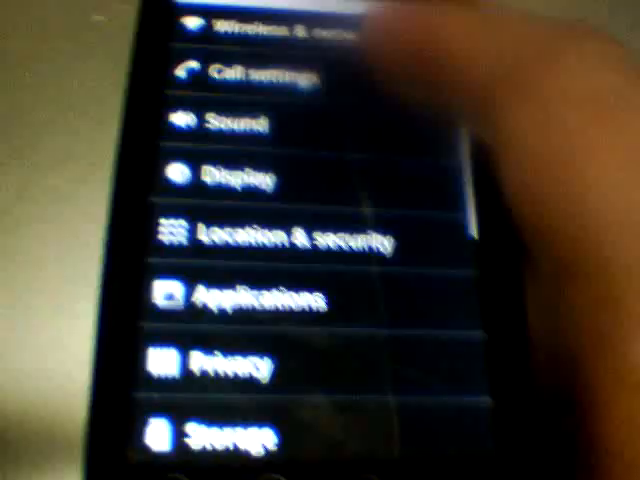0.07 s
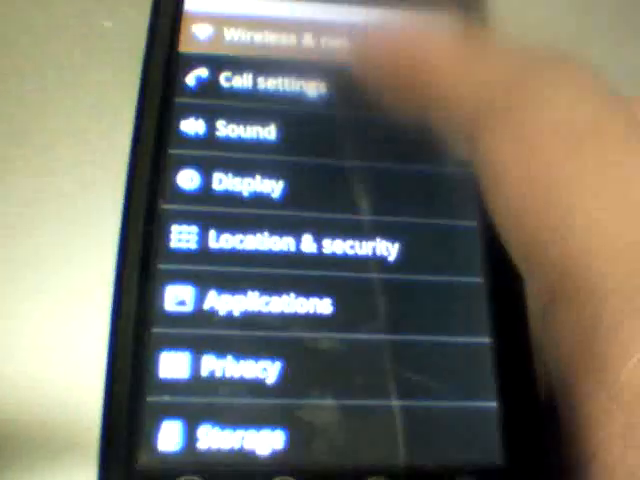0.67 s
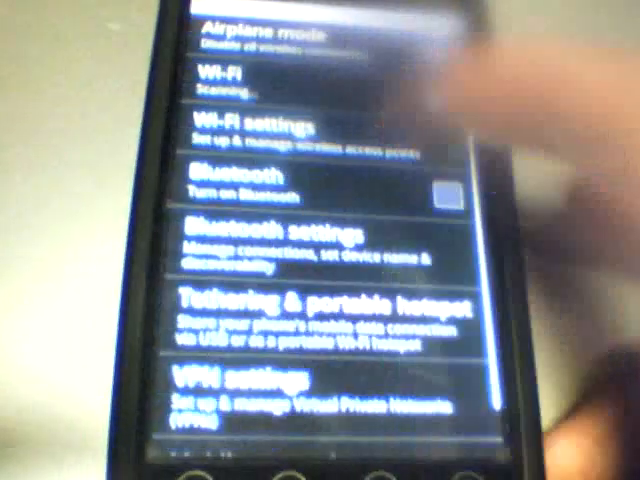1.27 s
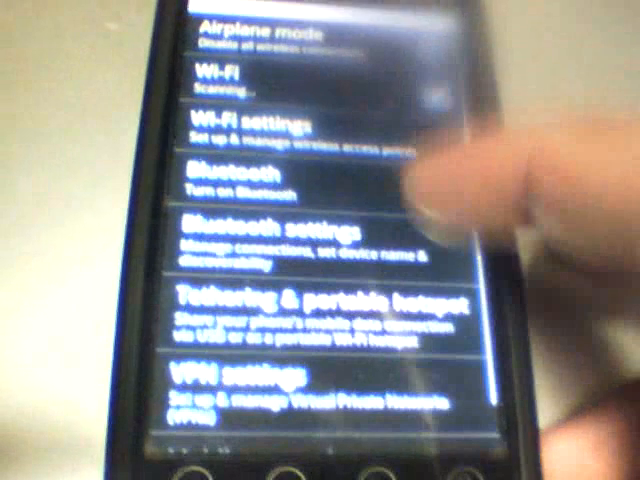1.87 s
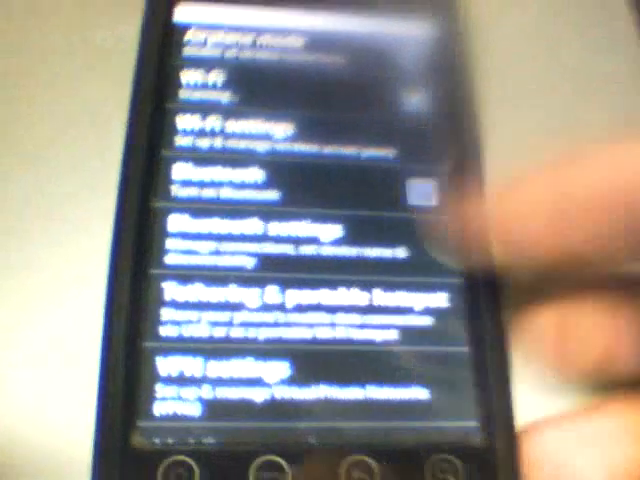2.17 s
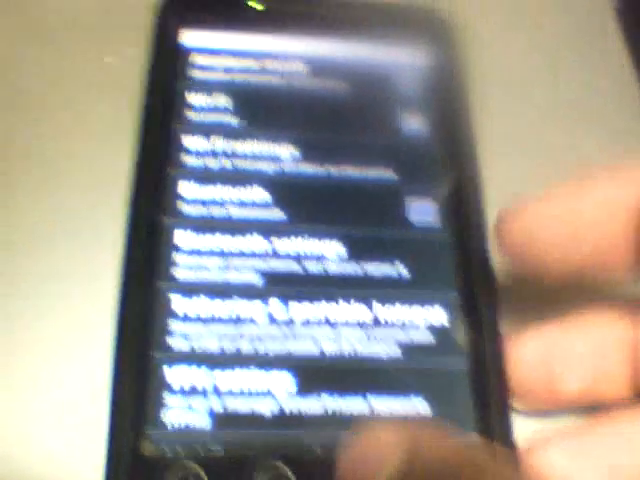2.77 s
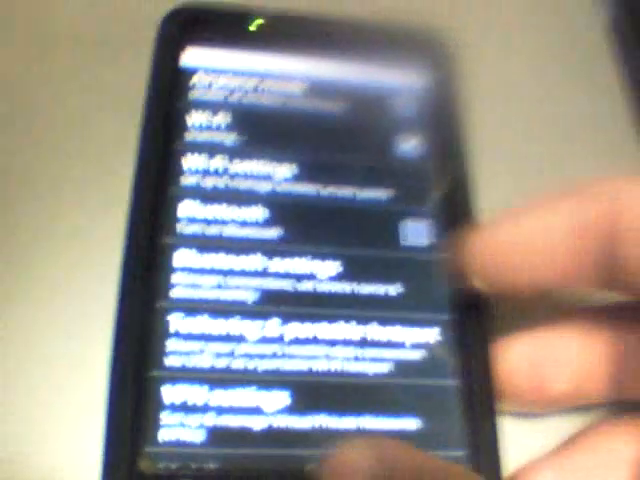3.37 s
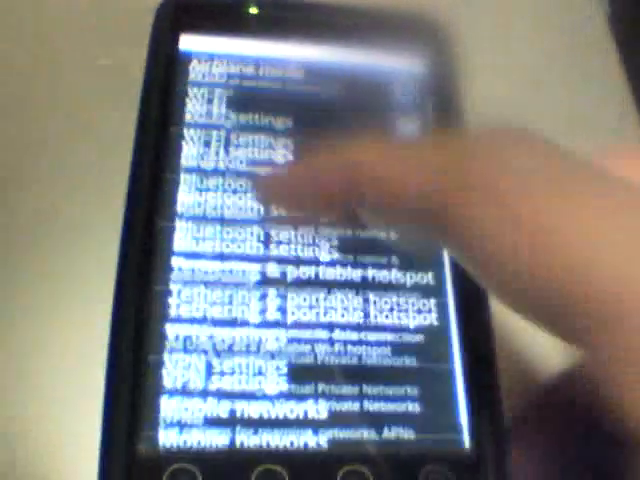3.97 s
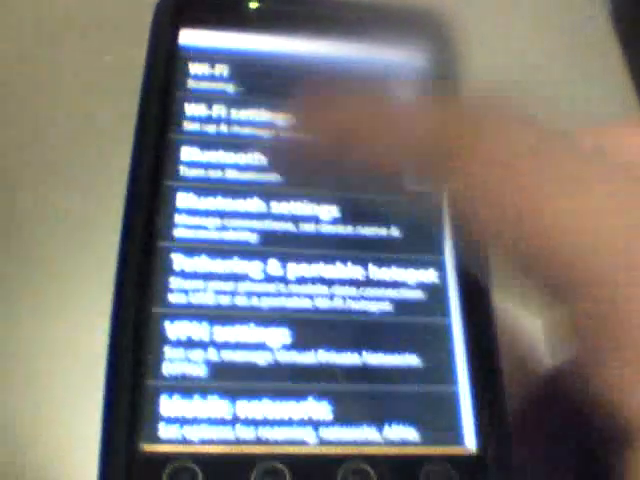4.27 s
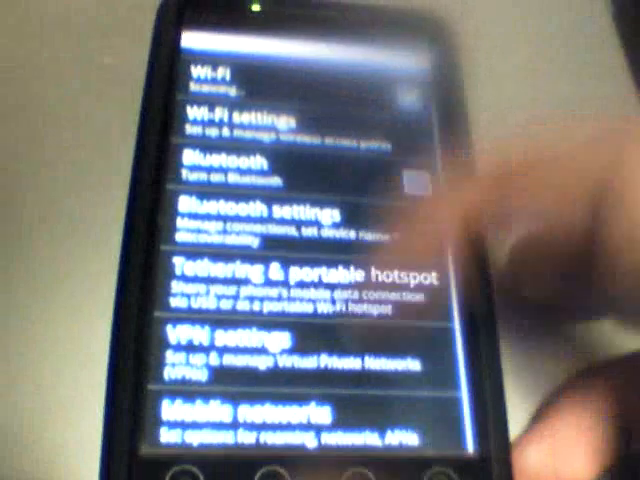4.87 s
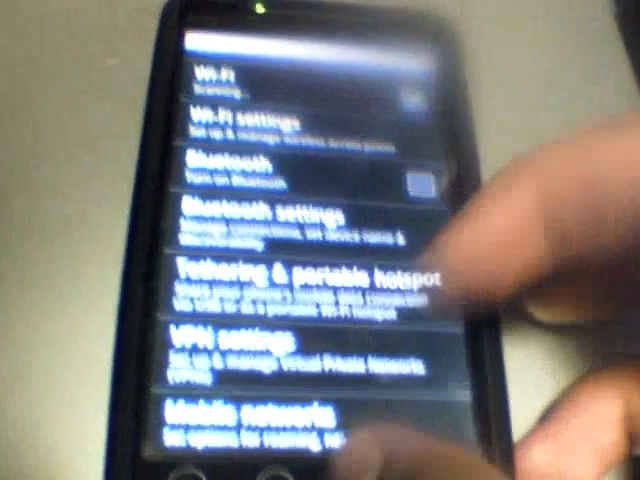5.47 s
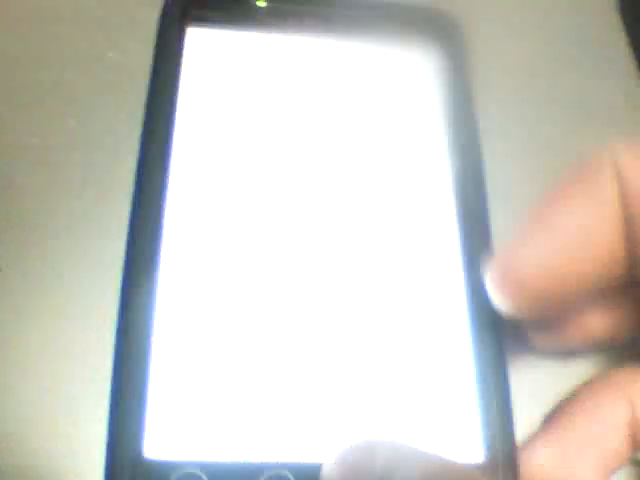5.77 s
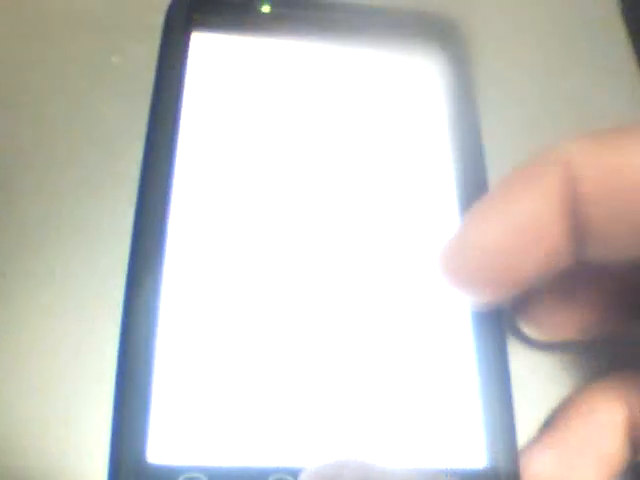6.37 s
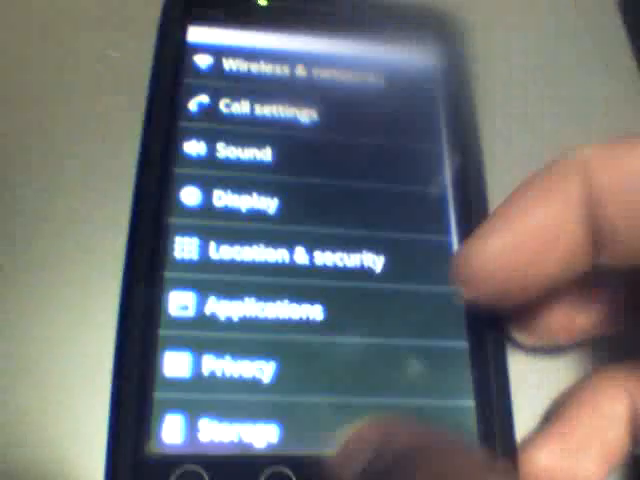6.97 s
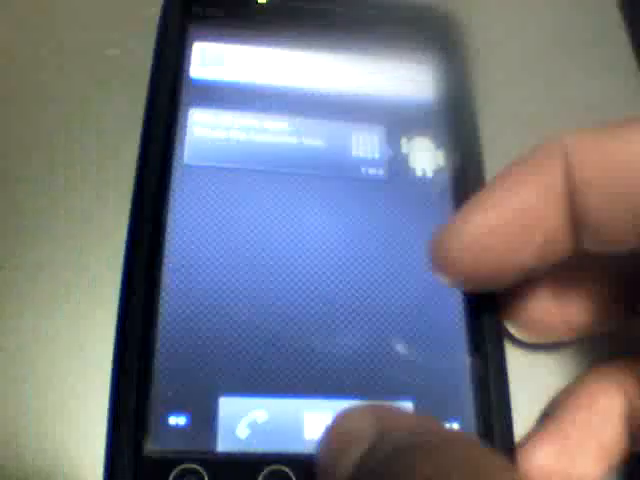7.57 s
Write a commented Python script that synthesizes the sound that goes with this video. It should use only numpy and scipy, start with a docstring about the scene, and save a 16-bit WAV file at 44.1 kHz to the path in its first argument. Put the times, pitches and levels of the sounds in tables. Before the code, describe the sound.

A phone is handled on a table in a quiet room, close to one small microphone. Right at the start a finger gives a sharp, short tap on the plastic case. Then only the background remains: a faint steady fan hum with electronic hiss and a thin whine. At about 2.9 seconds a soft touch leads to two clear taps at 3.1 and 3.3 seconds, followed by a very faint fingertip creak on the glass and a low rub of skin. A soft knock comes at 4.3 seconds. The loudest tap lands at 5.8 seconds, with a gentle bump and brief rub just after. Near 7.4 seconds two soft knocks lead into a short, quiet scrape as the phone drags on the table. A barely audible low tone comes and goes around 1 and 6 seconds.

```python
"""Phone handled on a table

Quiet room, one small mono microphone close to the phone. Keys and fingertips knock the case, which
rings briefly; a fingertip creaks on the glass, and the hand nudges the phone and drags it a little.
Behind it a fan hums steadily, a low tone comes and goes, and the mic's electronics hiss and whine."""
import sys
import numpy as np
from scipy import signal
from scipy.fft import rfft, irfft, next_fast_len
from scipy.io import wavfile
from scipy.ndimage import uniform_filter1d

SR = 44100
rng = np.random.default_rng(int(sys.argv[2]) if len(sys.argv) > 2 else 0)


def store_pcm(level_fs):
    """Save levels as 16-bit WAV."""
    pcm = np.round(np.clip(level_fs, -1, 1) * 32767).astype(np.int16)
    wavfile.write(sys.argv[1], SR, np.atleast_2d(pcm).T)


N = 335601
TIME = np.arange(N) / SR
RING_TIME = TIME[:SR // 6]

# spectrum of the fan's moving air: frequency_hz, relative_db
FAN_AIR = [(20, -1), (55, -1), (90, -6), (150, -7.5), (210, -4.5), (260, -2.5), (340, -1), (480, -3),
           (630, 1.5), (850, -1), (1100, -5), (1400, -11.5), (1900, -21), (4000, -45)]
# mains hum and fan tones: pitch_hz, level_db, width_hz
FAN_TONES = [(59.2, -80.5, 1.8), (120.2, -69.5, 3.4), (168, -80, 2.7), (203.7, -79, 4.8), (284.4, -75, 6),
             (338.4, -72, 10.06), (423.4, -73, 6.4), (609, -68, 6.92), (832, -69.5, 6.4), (1580, -85, 14)]
# spectrum of the preamp hiss: frequency_hz, relative_db
PREAMP_HISS = [(20, 0), (1500, 0), (2900, 0.86), (4700, 1), (6000, 0.14), (16000, 0.16)]
# electronic whines: pitch_hz, level_db
WHINES = [(1815, -73.8), (2082, -88.5), (15299, -84)]
# sharp taps on the case: start_s, push_db, push_cutoff_hz, click_db, click_cutoff_hz, bass_cutoff_hz,
# direction (the shell snaps outward +1 or inward -1)
CASE_TAPS = [(0.0391, -2, 1880, -1, 9000, 130, 1), (3.0917, -6, 1200, -12, 3600, 115, 1),
             (3.3438, -5, 1750, -10.5, 3600, 165, -1), (5.7678, 1, 2600, 1, 4900, 180, -1)]
# modes of the phone on the table, moved by a push: pitch_hz, level_db, t60_s
BODY_MODES = [(232, -19, .016), (443, -29, 0.014), (657, -36, 0.032), (949, -16.5, 0.02),
              (1240, -35.5, .019)]
# modes of the plastic shell, rung by a hard click: pitch_hz, level_db, t60_s
SHELL_MODES = [(1470, -41.5, 0.018), (2080, -41.5, 0.015), (2450, -45, 0.011), (2865, -32.5, 0.0076),
               (3560, -48, 0.0095), (4076, -44, 0.011), (4650, -53, .035), (6100, -50.5, 0.014),
               (7130, -46, .013), (7970, -50, 0.014)]
# spells of the low tone: start_s, end_s, level_db
DRONE_SPELLS = [(0.7, 1.453, -70.5), (5.853, 6.6, -70.5)]
# the hand shifts its grip: peak_s, level_db, swell_s, fade_s (both per 20 dB)
GRIP_SHIFTS = [(2.87, -65, .2, 1.1), (3.42, -62, .4, .7), (3.88, -64, .3, .8), (6.145, -52.5, .06, .1),
               (7.53, -53, .2, .11)]
# soft fingertip touches: start_s, knock_db, pitch_hz, t60_s, thud_db, rebound_gap_s, rebound_loss_db
SOFT_TOUCHES = [(2.893, -43, 950, .013, -54, .006, 16), (3.927, -51, 4300, .014, -75, .006, 18),
                (4.271, -31, 855, .01, -47, .0105, 8), (6.030, -39, 850, .018, -45, .0046, 1),
                (7.348, -35, 640, .019, -52, .012, 16), (7.385, -33, 590, .034, -61, .015, 6)]
# modes of the table under a soft touch: pitch_hz, relative_db, t60_s
TABLE_MODES = [(96, 0, 0.052), (202, 1, .025), (367, 2.5, 0.026)]
# the phone's rim clacking on the table: pitch_hz, relative_db, t60_s
RIM_MODES = [(1250, 4, .014)]
# pace of the fingertip's stroke over the glass: time_s, slips_per_s
CREAK_PACE = [(3.41, 91), (3.55, 80), (3.68, 107)]


def undb(db):
    """Decibels to gain."""
    return 10 ** (np.asarray(db) / 20)


def unit(x):
    """Scale to rms 1."""
    return x / np.sqrt(np.mean(x ** 2))


def add(track, start_s, sound):
    """Mix a sound into a track at start_s."""
    i = int(np.clip(start_s * SR, 0, N - 1))
    track[i:i + len(sound)] += sound[:N - i]


def cut(x, hz, kind, order=2):
    """Butterworth low-pass or high-pass."""
    return signal.sosfilt(signal.butter(order, hz, kind, fs=SR, output="sos"), x)


def ring(modes):
    """Decaying sines after one blow, from rows of pitch_hz, level_db, t60_s."""
    return sum(undb(db) * np.sin(2 * np.pi * hz * RING_TIME) * np.exp(-np.log(1000) * RING_TIME / t60_s)
               for hz, db, t60_s in modes)


def noise(points):
    """Noise of rms 1, coloured by rows of frequency_hz, relative_db."""
    hz, db = np.transpose(points)
    size = next_fast_len(N)
    bin_hz = np.maximum(np.arange(size // 2 + 1) * SR / size, 1)
    colour = undb(np.interp(np.log(bin_hz), np.log(hz), db))
    return unit(irfft(rfft(rng.standard_normal(size)) * colour, size)[:N])


def wander(rate_hz):
    """Smooth random drift of rms 1."""
    hold = int(SR / rate_hz)
    steps = np.repeat(rng.standard_normal(N // hold + 1), hold)
    return unit(uniform_filter1d(steps, hold)[:N])


def fan(air_db=-57.5):
    """In the background, air rushes with a slight flutter and tones wander in pitch and strength."""
    out = noise(FAN_AIR) * undb(air_db + 0.1 * wander(1.88) + 0.19 * wander(21))
    for hz, db, width_hz in FAN_TONES:
        phase = 2 * np.pi * np.cumsum(hz + width_hz / 2 * wander(12)) / SR
        out += undb(db + 0.86 * wander(6)) * unit(np.sin(phase))
    return out


def electronics(hiss_db=-61.5):
    """The microphone's own floor: even preamp hiss with thin steady whines."""
    whine = sum(undb(db) * unit(np.sin(2 * np.pi * hz * TIME)) for hz, db in WHINES)
    return undb(hiss_db) * noise(PREAMP_HISS) + whine


def taps():
    """Close to the mic, a cushioned push rocks the phone and the hard contact clicks in the shell."""
    out = np.zeros(N)
    # the whole phone rocks one way while its panels flex the other way
    body = ring(BODY_MODES[:1]) - ring(BODY_MODES[1:])
    for start_s, push_db, push_hz, click_db, click_hz, bass_hz, direction in CASE_TAPS:
        # a longer contact reaches fewer of the high modes
        push = cut(cut(body, push_hz, "low", order=1), push_hz, "low", order=1)
        click = cut(ring(SHELL_MODES), click_hz, "low")
        blow = undb(push_db) * push + direction * undb(click_db) * click
        # so small a body radiates little bass; how little depends on the grip
        add(out, start_s, cut(blow, bass_hz, "high"))
    return out


def drone(pitch_hz=167.5):
    """A faint low tone fades in and out."""
    level = sum(undb(db) * ((TIME > start_s) & (TIME < end_s)) for start_s, end_s, db in DRONE_SPELLS)
    return uniform_filter1d(level, SR // 20) * unit(np.sin(2 * np.pi * pitch_hz * TIME))


def grip():
    """Skin creeping on the case makes an uneven low rumble that swells and fades with each shift."""
    level = np.zeros(N)
    for peak_s, db, swell_s, fade_s in GRIP_SHIFTS:
        drop_db = 20 * np.maximum((peak_s - TIME) / swell_s, (TIME - peak_s) / fade_s).clip(0, 10)
        level += undb(db - drop_db)
    rumble = noise([(20, -29), (50, 2), (80, -5), (170, -5), (280, -10.5), (500, -10),
                    (1300, -27), (3000, -53)])
    return rumble * level * undb(1.4 * wander(25))


def touches(seat_lag_s=.0034, rebound_hz=580):
    """Skin damps the case to one short resonance; the phone seats with a thud and rebounds twice."""
    out = np.zeros(N)
    thud = cut(cut(ring(TABLE_MODES), 700, "low"), 70, "high")
    clack = cut(cut(ring(RIM_MODES), 1700, "low", order=4), 400, "high")
    for start_s, knock_db, hz, t60_s, thud_db, gap_s, loss_db in SOFT_TOUCHES:
        add(out, start_s + seat_lag_s, undb(thud_db) * (thud + clack))
        for bounce in range(3):
            knock = cut(ring([(hz, knock_db - bounce * loss_db, t60_s)]), 1.7 * hz, "low")
            add(out, start_s + bounce * gap_s, cut(knock, 0.31 * hz, "high"))
            hz += .8 * (rebound_hz - hz)  # a rebound is softer, so its pitch sinks
    return out


def creak(start_s=3.35, length_s=.41, fade_s=.04, level_db=-60.5):
    """A fingertip sticks and slips on the glass: a soft, slightly unsteady sawtooth."""
    times_s, slips_per_s = np.transpose(CREAK_PACE)
    slip_hz = np.interp(TIME, times_s, slips_per_s) * (1 + .015 * wander(60))
    phase = 2 * np.pi * np.cumsum(slip_hz) / SR
    saw = sum(undb(db) * np.sin(harmonic * phase) for harmonic, db in enumerate([-2, 1.5, 1, -9], 1))
    age_s = TIME - start_s
    envelope = np.clip(np.minimum(age_s, length_s - age_s) / fade_s, 0, 1)
    return unit(saw) * undb(level_db) * envelope


def drag(start_s=7.473, length_s=.125, slip_hz=116, slowing_hz_per_s=340, fade_db_per_s=155):
    """The phone sticks and slips ever more slowly; each slip shakes the table and scrapes the case."""
    out, age_s = np.zeros(N), 0
    for gap_jitter, level_jitter, detune in rng.standard_normal((20, 3)):
        if age_s > length_s:
            break
        shake_gain = min(age_s / .017, 1) * undb(-39 - fade_db_per_s * age_s)
        shake = shake_gain * ring([(108, 0, 0.043)])
        upper_mode = ring([(1300 * (1 + .03 * detune), -49, .014)])
        lower_modes = ring([(800 * (1 + .1 * detune), -53, .01), (280, -53, .018)])
        scrape = cut(upper_mode - lower_modes, 1600, "low", order=4)
        loose = min(age_s / .035, 1)  # the scrape grows as the phone breaks loose
        add(out, start_s + age_s, shake + loose * undb(1.5 + 3 * level_jitter) * scrape)
        age_s += (1 + .08 * gap_jitter) / max(slip_hz - slowing_hz_per_s * age_s, slip_hz / 2)
    return out


def scene():
    """The phone up close and the room behind it; one microphone feeds both channels."""
    handling = taps() + grip() + touches() + creak() + drag()
    mono = handling + fan() + electronics() + drone()
    return np.array([mono, mono])


def record(dry, top_hz=15750, dc_offset=.0035):
    """The converter cuts the top and sits slightly off zero."""
    low_pass = signal.ellip(12, .1, 70, top_hz, fs=SR, output="sos")
    return signal.sosfilt(low_pass, dry) + dc_offset


dry = scene()
out = record(dry)
store_pcm(out)
```